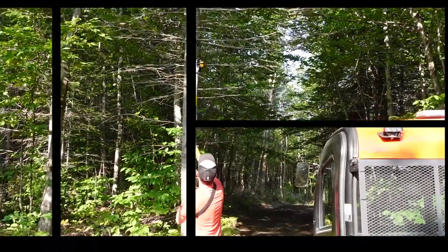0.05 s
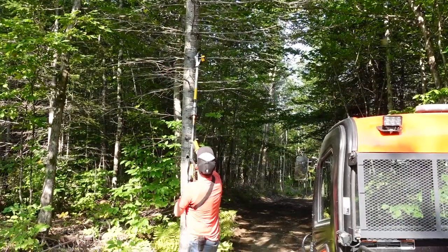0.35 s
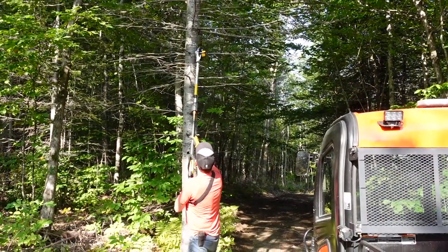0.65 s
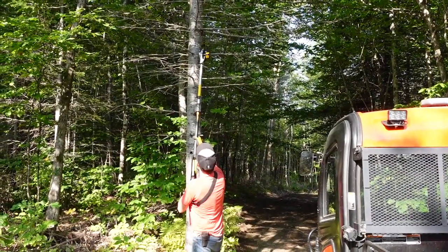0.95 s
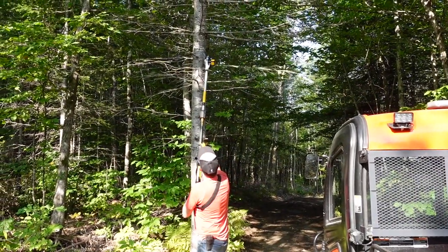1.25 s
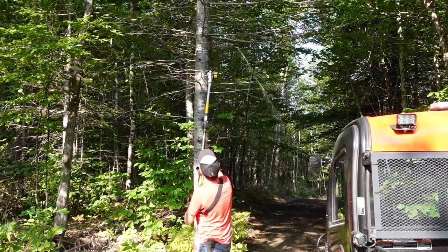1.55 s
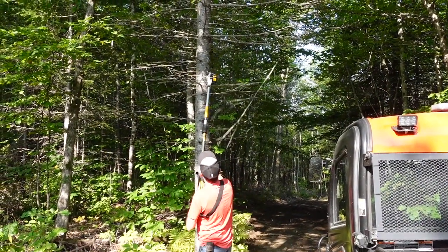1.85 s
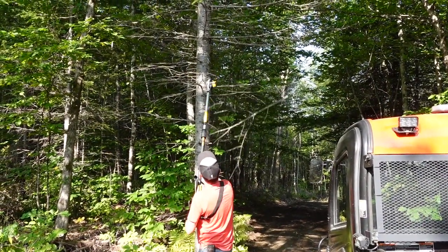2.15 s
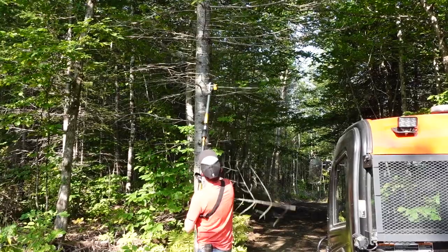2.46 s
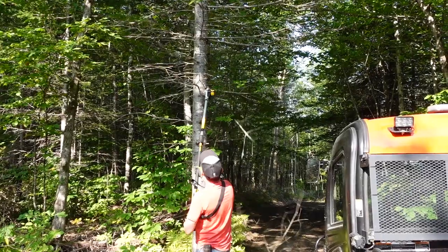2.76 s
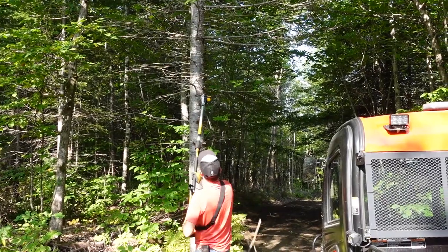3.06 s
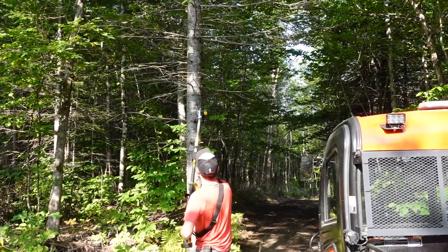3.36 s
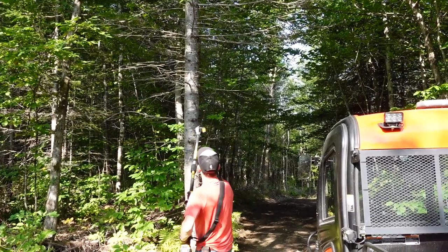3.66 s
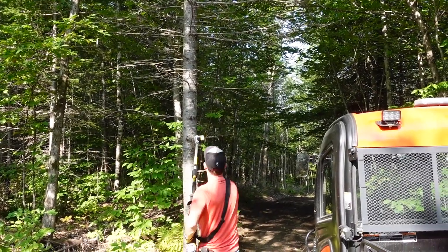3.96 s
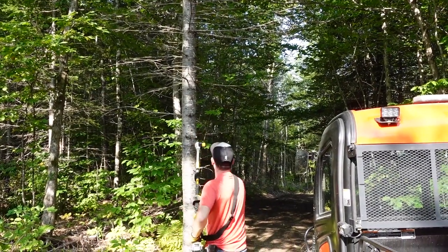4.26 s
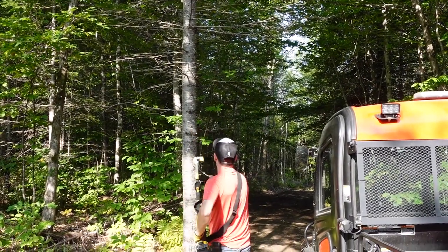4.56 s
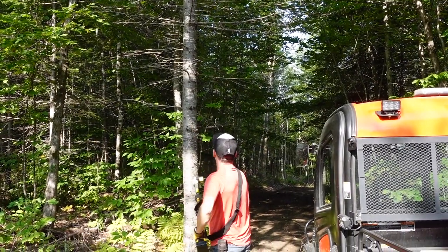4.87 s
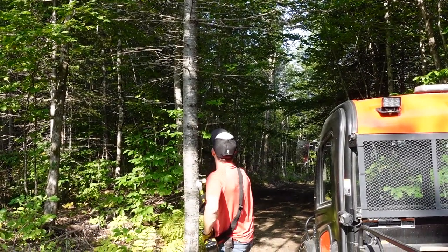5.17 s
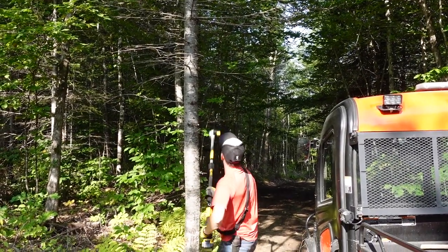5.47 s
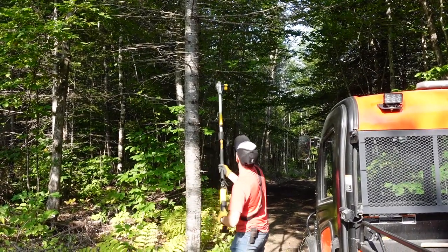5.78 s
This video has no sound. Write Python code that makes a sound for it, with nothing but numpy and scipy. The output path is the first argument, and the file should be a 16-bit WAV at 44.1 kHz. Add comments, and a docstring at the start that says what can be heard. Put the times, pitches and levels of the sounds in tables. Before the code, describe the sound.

In a quiet forest, a cordless pole saw runs four times, some metres from the microphone. Each burst whines up with a rattling, hissing chain and thin metallic squeals, while the teeth catch dry branches with short crunches and sharp knocks. The saw slows briefly between bursts. After the last it coasts to rest, then a step rustles the undergrowth and the pole gives a short scrape.

```python
"""A quiet forest, the microphone some metres from a spruce being limbed with a cordless pole saw.
A faint hum dies away in the still air, then the trigger is pulled four times. With each pull the gears
whine up, the chain rattles, hisses and squeals round its ringing bar, and the teeth bite dry branches.
After the last pull, as the chain coasts to rest, the sawyer steps into the undergrowth and raises
the pole with a scrape."""
import sys
import numpy as np
from scipy import signal
from scipy.fft import rfft, irfft
from scipy.io import wavfile
from scipy.ndimage import uniform_filter1d

SR = 44100
rng = np.random.default_rng(int(sys.argv[2]) if len(sys.argv) > 2 else 0)


def generate_wav(sig):
    """Save sig (samples, or channels by samples) to the path in sys.argv[1] as 16-bit PCM at SR."""
    pcm = np.round(np.clip(np.atleast_2d(sig).T, -1, 1) * 32767).astype(np.int16)
    wavfile.write(sys.argv[1], SR, pcm)


N = 265482
T = np.arange(N) / SR


def undb(db):
    """Decibels to gain."""
    return 10 ** (np.asarray(db) / 20)


def unit(x):
    """Scale to rms 1."""
    return x / np.sqrt(np.mean(x ** 2) + 1e-18)


def curves(rows):
    """Each column after the first, time_s, joined by straight lines."""
    times_s, *columns = np.transpose(rows)
    return [np.interp(T, times_s, column) for column in columns]


def swell(start_s, length_s):
    """A rounded envelope that peaks at 1."""
    return np.sqrt(np.maximum(0, 1 - (2 * (T - start_s) / length_s - 1) ** 2))


def noise():
    """White noise."""
    return rng.standard_normal(N)


def walk(rate_hz):
    """Random levels, rate_hz a second, joined by straight lines, at rms 1."""
    hold = max(int(SR / rate_hz), 1)
    return unit(uniform_filter1d(np.repeat(noise()[:N // hold + 1], hold), hold)[:N])


def colour(x, points):
    """Causal filter through points of freq_hz, gain_db, built from the cepstrum."""
    hz, db = np.transpose(points)
    bins_hz = np.fft.rfftfreq(2048, 1 / SR)
    gain = undb(np.interp(np.log(bins_hz + 1), np.log(hz), db))
    cepstrum = irfft(np.log(gain))
    half = len(cepstrum) // 2
    causal = np.r_[cepstrum[0], 2 * cepstrum[1:half]]
    response = irfft(np.exp(rfft(causal, 2 * half)))
    return signal.oaconvolve(x, response)[:N]


def ring(x, modes):
    """Parallel resonances: pitch_hz, width_hz, gain_db."""
    return sum(undb(db) * signal.lfilter(*signal.iirpeak(hz, hz / width, fs=SR), x)
               for hz, width, db in modes)


def hollow(x, modes):
    """Resonances with steep sides and dark gaps between them, at rms 1."""
    return unit(sum(ring(ring(x, [(hz, 2 * width, db)]), [(hz, 2 * width, 0)])
                    for hz, width, db in modes))


def grains(rate_hz, spread_db):
    """Random impacts, rate_hz a second, scattered in size."""
    hit = rng.random(N) < rate_hz / SR
    return unit(hit * np.sign(noise()) * undb(spread_db * np.clip(noise(), -2, 2)))


def strikes(rate_hz, decay_s, scatter_db):
    """Envelope of blows that come rate_hz times a second, each with its own force."""
    turns = np.cumsum(rate_hz) / SR
    force = undb(scatter_db * np.clip(noise(), -2, 2))[turns.astype(int)]
    return unit(force * np.exp(-(turns % 1) / rate_hz / decay_s))


# The forest air around the microphone: freq_hz, gain_db
AIR_SPECTRUM = [(18, -38), (30, -26), (192, -6.5), (249, -7), (307, -11), (505, -10.5), (852, -11),
                (1470, -17), (2360, -19), (4910, -21), (5590, -23), (7650, -25), (15500, -36)]

def forest(air_db=-67, side_db=-69.5, hum_hz=644, hum_db=-69.5, hum_end_s=0.2):
    """Still air among the trees, a little wide in the low mids, with a brief faint hum."""
    air = undb(air_db + 0.66 * walk(3.8)) * unit(colour(noise(), AIR_SPECTRUM))
    fading = np.clip((hum_end_s - T) / .03, 0, 1)
    band = [(hum_hz, 50, 0)]
    hum = fading * undb(hum_db) * unit(ring(ring(noise(), band), band))
    side = unit(colour(noise(), [(30, -25), (70, -12), (150, -12), (500, 0), (1200, -21), (8000, -47)]))
    return air + hum + undb(side_db) * side * np.array([[1], [-1]])


# The tone of one knock: ratio_to_centre, gain_db
KNOCK_SPECTRUM = [(.08, -44), (.25, -16), (.5, -5), (1, 6.5), (1.7, -1.5), (3, -16), (7, -36)]
# Hard knocks from the saw and the tree: start_s, peak_db, decay_s, centre_hz
KNOCKS = [(0.077, -48.5, 0.0067, 5030), (0.327, -43, 0.0075, 3300), (.345, -54, 0.064, 4000),
          (.458, -25.5, 0.014, 2400), (1.181, -17, 0.0028, 2600), (1.639, -16.5, .012, 2000),
          (2.303, -21, 0.031, 1050), (2.337, -22, 0.039, 1257), (3.005, -23, 0.00057, 5090),
          (3.062, -20, 0.0027, 3484), (3.077, -16, 0.0034, 2901), (3.849, -26, .014, 2184),
          (3.882, -16, 0.0058, 3600), (3.904, -20.5, 0.011, 1040), (4.2, -15, 0.0062, 5066),
          (5.198, -28, 0.011, 1662), (5.398, -22.5, 0.0015, 8080), (5.802, -35, 0.011, 3690)]

def knocks():
    """The trigger clicks, the chain snatches, the bar hits wood and chips fly: short bursts of noise."""
    out = np.zeros(N)
    age_s = T[:SR // 2]
    for start_s, peak_db, decay_s, centre_hz in KNOCKS:
        burst = rng.standard_normal(len(age_s)) * np.exp(-age_s / decay_s)
        knock = colour(burst, [(ratio * centre_hz, db) for ratio, db in KNOCK_SPECTRUM])
        start = int(start_s * SR)
        out[start:start + len(knock)] += undb(peak_db) * knock[:N - start] / np.abs(knock).max()
    return out


def trunks(x, wet_db, t60_s, side_db):
    """The direct sound and its echoes off the trunks, almost the same left and right."""
    tail = noise() * np.exp(-np.log(1000) * T / t60_s) * (T > .008)
    tail = colour(tail, [(100, -3.5), (2500, -15.5), (6000, -11), (14000, -3)])
    echo = signal.oaconvolve(x, tail[:SR] / np.linalg.norm(tail))[:N]
    return x + echo * (undb(wet_db) + undb(side_db) * np.array([[1], [-1]]))


GOVERNED_HZ = 343  # the governor's cap on the shaft rate
# Pulls of the trigger, with levels before speed and torque scale them: pressed_s, released_s,
# rattle_db, hiss_db, bar_db, singing_db, motor_db, strain_db, slap_db, friction_hz_per_s
TRIGGER_PULLS = [(0.455, 1.561, -31.5, -27.5, -33.5, -34.5, -60.5, -23.5, -44, 207.7),
                 (1.872, 3.29, -31, -28, -34, -36.5, -58.5, -24, -34, 340.8),
                 (3.64, 4.182, -32, -29, -34, -46, -49.5, -36, -43, 231.3),
                 (4.328, 4.98, -33, -27.5, -38.5, -42.5, -52, -27, -31.5, 192)]

def saw(lowered_s=4.75, lowering_s=0.37, lowered_db=-3):
    """The saw, some metres off: speed and torque drive its parts, and each pull has its own balance."""
    shaft_hz, torque, coasting = shaft()
    speed = shaft_hz / GOVERNED_HZ
    balance = [(s, *levels) for on, off, *levels, _, _, _ in TRIGGER_PULLS for s in (on, off)]
    rattle_db, hiss_db, bar_db, singing_db, motor_db = curves(balance)
    *_, strain_db, slap_db, _ = latest_pull()
    # Lowered behind the sawyer, the chain is quieter; its hiss and bar lose a little less.
    lowered = np.clip((T - lowered_s) / lowering_s, 0, 1)
    spared_db = 0.5 * lowered
    crawl = .13 * (shaft_hz > 0)  # links knock on the bar until the chain stands still
    links = undb(lowered_db * lowered) * chain(
        shaft_hz,
        rattle_gain=undb(rattle_db + 2.5 * torque) * speed ** 0.68,  # taut, it rattles and hisses more
        housing_gain=undb(rattle_db - 3.5) * speed ** 0.68,
        strain_gain=undb(strain_db) * torque * speed,
        slap_gain=undb(slap_db) * coasting * speed,
        hiss_gain=undb(hiss_db + 4.5 * torque + spared_db) * speed ** 1.19,
        bar_gain=undb(bar_db + spared_db) * np.maximum(speed ** 0.86, crawl))
    whine = undb(rattle_db) * speed * (1 - 0.17 * coasting) * gears(shaft_hz)
    hum = undb(motor_db) * speed ** 1.43 * motor(shaft_hz)
    whistle = undb(singing_db) * speed ** 4 * singing()  # heard only near full speed
    return links + whine + hum + whistle + squeals() + cutting(shaft_hz)


def latest_pull():
    """The columns of the pull that began last, at every moment."""
    rows = np.array(TRIGGER_PULLS)
    return rows[np.maximum(np.searchsorted(rows[:, 0], T) - 1, 0)].T


def shaft(free_hz=468, spin_up_s=.39, coast_s=.58):
    """The trigger spins the motor up, wood brakes it, dry and viscous friction run it down."""
    pulled = sum((T >= on) & (T < off) for on, off, *_ in TRIGGER_PULLS)
    braking = sum(drag * swell(start_s, length_s) for start_s, length_s, *_, drag in WOOD_BITES)
    *_, friction = latest_pull()
    step = SR // 1000
    hz, rates = 0, []
    for on, drag, dry_friction in zip(pulled[::step], braking[::step], friction[::step]):
        push = (free_hz - hz) / spin_up_s if on else -dry_friction - hz / coast_s
        hz = min(max(hz + (push - drag) * step / SR, 0), GOVERNED_HZ)
        rates.append(hz)
    shaft_hz = np.interp(T, T[::step], rates)
    torque = uniform_filter1d(pulled * np.sqrt(np.maximum(1 - shaft_hz / GOVERNED_HZ, 0)), size=1200)
    coasting = uniform_filter1d(1. - pulled, size=2400)
    return shaft_hz * (1 + .005 * walk(7)), torque, coasting


# Links slapping the sprocket: freq_hz, gain_db
RATTLE_SPECTRUM = [(40, -59), (150, -42), (300, -59), (500, -30), (720, -8.5), (1000, 1), (1330, -1),
                   (1510, -2), (1750, 2), (2450, 1), (2850, -1), (3120, -2), (3450, 0.5), (4700, -10),
                   (6600, -19), (16000, -30)]
# Links sliding in the groove: freq_hz, gain_db
HISS_SPECTRUM = [(100, -78), (2500, -32), (4100, 0.5), (4750, -0.5), (5350, -2), (6000, 0), (6650, -2),
                 (7200, 0.5), (8000, 1), (9100, -3), (9650, 0.5), (10050, -2.5), (10700, -2), (12000, -6),
                 (15800, -10.5)]
# The gear housing and the pole: pitch_hz, width_hz, gain_db
HOUSING_MODES = [(589, 20.7, -1), (1015, 58, 2), (1192, 80, 4), (1840, 130, 0), (2319, 64, 6.5),
                 (2383, 92, 9), (2773, 160, 5.5), (4410, 96, 2.5), (4830, 260, 3), (5090, 110, -3),
                 (6100, 230, 0)]
# The drive ringing under torque: pitch_hz, width_hz, gain_db
STRAIN_MODES = [(2206, 170, -2), (2487, 150, 0.5), (2766, 130, -0.5)]
# The bar and its cover, slapped by the slack chain: pitch_hz, width_hz, gain_db
SLAP_MODES = [(1154, 130, -2.5), (2340, 150, 0.5), (2600, 88, -5), (3560, 110, -3), (4350, 400, 1),
              (4780, 280, -11), (7700, 800, -5.5)]
# The steel guide bar: pitch_hz, width_hz, gain_db
BAR_MODES = [(3548, 39, 14), (3676, 17.4, 16), (3739, 66, 12), (3833, 95, 10)]

def chain(shaft_hz, rattle_gain, housing_gain, strain_gain, slap_gain, hiss_gain, bar_gain):
    """Links slap the sprocket and slide in the groove; housing and bar ring with them."""
    links = strikes(200 + shaft_hz, decay_s=0.014, scatter_db=1)
    slack = unit(undb(0.72 * walk(110) + 0.55 * walk(14)))  # the loose chain whips about
    contact_hz = 3000 + 22 * shaft_hz  # a faster chain makes more contacts
    rattle = unit(colour(links * grains(contact_hz, spread_db=2.5), RATTLE_SPECTRUM))
    housing, strain, slap = (hollow(grains(contact_hz, spread_db=2.5), modes)
                             for modes in (HOUSING_MODES, STRAIN_MODES, SLAP_MODES))
    hiss = unit(colour(links * grains(2 * contact_hz, spread_db=4), HISS_SPECTRUM))
    bar = hollow(noise(), BAR_MODES) * undb(walk(14))  # its ring wavers as the tension changes
    return slack * (rattle_gain * rattle + housing_gain * housing + strain_gain * strain
                    + slap_gain * slap + hiss_gain * hiss + bar_gain * bar)


# The partials of the gear whine: shaft_multiple, level_db
GEAR_HARMONICS = [(2, -15), (3, -8), (4, 0), (8, -17)]

def gears(shaft_hz, gain_db=-15.3, resonance_hz=235, half_width_hz=90, lift_db=9.5):
    """Wavering shaft harmonics, lifted as the shaft rate sweeps through the resonance of the drive."""
    phase = 2 * np.pi * np.cumsum(shaft_hz * (1 + .006 * walk(150))) / SR
    whine = sum(undb(db + 3 * walk(60)) * np.sin(multiple * phase) for multiple, db in GEAR_HARMONICS)
    resonance_db = lift_db * np.exp(-((shaft_hz - resonance_hz) / half_width_hz) ** 2)
    radiated = colour(whine, [(60, -50), (200, -30), (450, -18), (620, -13), (780, -2), (950, 0),
                              (1200, 3), (1400, -4), (3000, -3)])
    return radiated * undb(resonance_db + gain_db)


# The motor case in the sawyer's hand: pitch_hz, width_hz, gain_db
CASE_MODES = [(414, 130, 6.5), (653, 60, -2), (696, 210, 0.5)]

def motor(shaft_hz):
    """The rotor hums once a turn, more so at speed, and shakes its hollow case."""
    phase = 2 * np.pi * np.cumsum(shaft_hz * (1 + .008 * walk(98))) / SR
    hum = (shaft_hz / GOVERNED_HZ) ** 2 * undb(-10 + 3 * walk(30)) * np.sin(phase)
    shaking = ring(noise(), CASE_MODES)
    case = colour(shaking, [(60, -28), (250, -6), (330, -6), (520, -1.5), (570, 4), (800, 1),
                            (2000, -17.5)])
    return unit(case) + hum


# The thin modes of the saw head: pitch_hz, width_hz, level_db
HEAD_MODES = [(1030, 80, -9), (1880, 80, -11), (2340, 110, -7), (3450, 90, -8), (3750, 70, -5),
              (4410, 80, -3.5), (4790, 80, -9), (5085, 70, -10), (5850, 120, -6), (9680, 300, -8),
              (10480, 200, -10), (11180, 200, -12)]

def singing():
    """The sliding chain keeps the saw head ringing, each mode swelling and fading on its own."""
    out = 0
    for pitch_hz, width_hz, level_db in HEAD_MODES:
        mode = [(pitch_hz, width_hz, 0)]
        tone = ring(ring(noise(), mode), mode)
        out = out + undb(level_db) * unit(tone * undb(1.8 * walk(7)))
    return out


# The chain squealing as it is snatched, pinched or let go, and longer steady tones where the bar and saw head
# ring: # start_s, length_s, first_hz, settled_hz, level_db
CHAIN_SQUEALS = [(.552, .1, 1520, 1900, -32), (.668, .09, 2000, 2560, -26), (.69, .055, 3450, 3680, -29),
                 (.75, .14, 2380, 2460, -28.5), (.76, .13, 2780, 2860, -30), (.88, .11, 4480, 4430, -31),
                 (.99, .09, 3250, 3420, -24.5), (1.1, .06, 3850, 3520, -30), (1.2, .075, 3560, 3700, -28),
                 (1.23, .33, 2320, 2250, -33), (1.3, .25, 3620, 3740, -32), (1.705, .042, 3800, 3480, -25),
                 (1.897, .045, 1350, 2350, -26), (1.928, .05, 2330, 2470, -26.5),
                 (1.943, .06, 3500, 3580, -23.5), (1.97, .09, 2250, 2740, -27),
                 (2.135, .095, 3660, 3720, -26), (2.322, .022, 3300, 3370, -23),
                 (2.35, .055, 3450, 3400, -27), (2.412, .02, 3550, 3620, -23), (2.44, .42, 3640, 3740, -30),
                 (2.55, .75, 1880, 1880, -37), (3.02, .28, 2340, 2385, -33.5), (3.03, .12, 3640, 3700, -32),
                 (3.15, .12, 3700, 3760, -25.5), (3.42, .13, 3680, 3620, -36),
                 (3.848, .03, 2650, 2400, -22.5), (3.88, .07, 2720, 2620, -32),
                 (3.88, .16, 3760, 3630, -29), (4.08, .06, 3640, 3720, -26.5), (4.35, .05, 3530, 3600, -28),
                 (4.45, .21, 3590, 3640, -27.5), (4.86, .15, 3540, 3620, -32),
                 (4.945, .04, 4500, 4340, -34.5), (5.118, .052, 4050, 3500, -28),
                 (5.15, .04, 4400, 4170, -36), (5.47, .05, 3620, 3650, -44), (5.57, .05, 3850, 3760, -47)]

def squeals(jitter_hz=38, settle_share=.5):
    """Rasping tones from the chain: each glides quickly, then settles towards its pitch."""
    rasp_hz = jitter_hz * (walk(700) + .2 * walk(80))
    out = np.zeros(N)
    for start_s, length_s, first_hz, settled_hz, level_db in CHAIN_SQUEALS:
        on = (T >= start_s) & (T < start_s + length_s)
        glide = np.exp(-(T[on] - start_s) / (settle_share * length_s))
        pitch_hz = settled_hz + (first_hz - settled_hz) * glide + rasp_hz[on]
        tone = np.sin(2 * np.pi * np.cumsum(pitch_hz) / SR)
        out[on] += undb(level_db) * swell(start_s, length_s)[on] * tone
    return out * unit(undb(3 * walk(280)))


# Dry fibres crunching: freq_hz, gain_db
CRUNCH_SPECTRUM = [(30, -56), (100, -46), (200, -7), (290, 0.5), (480, 0.5), (1100, 7), (2300, 10),
                   (3800, 11), (6000, 4), (15000, -11)]
# The limb booming: ratio_to_lowest_note, gain_db
LIMB_SPECTRUM = [(.17, -42), (.55, -33), (.76, -17), (1, -1), (1.4, -5), (1.85, 1), (3.1, -4.5),
                 (10, -17.5)]
# Teeth biting the spruce: start_s, length_s, crunch_db, boom_db, lowest_note_hz, braking_hz_per_s
WOOD_BITES = [(0.961, .024, -27.5, -54, 160, 1500), (0.991, 0.021, -31, -48, 145, 900),
              (1.015, 0.024, -34, -41, 145, 700), (1.042, .03, -36, -41, 147, 100),
              (1.108, 0.05, -29.5, -50, 148, 500), (1.164, 0.033, -48, -44, 150, 100),
              (2.302, .03, -33, -43, 149.4, 1800), (2.335, 0.019, -34, -38.5, 151, 1000),
              (2.361, 0.038, -29, -50, 149.5, 100), (2.43, 0.019, -25.5, -48, 150, 700),
              (2.454, .045, -35, -41.5, 141, 700), (2.736, 0.029, -45, -55, 132.2, 100),
              (3.202, 0.026, -31.5, -49, 158.8, 200), (3.847, 0.043, -30.5, -40.5, 283, 100),
              (3.899, .018, -28.5, -48, 308, 100), (4.607, 0.06, -32.5, -53, 189, 200),
              (4.737, 0.036, -32, -49, 163.2, 300), (4.837, 0.032, -37, -55, 160, 200)]
# Flying sawdust: freq_hz, gain_db
SAWDUST_SPECTRUM = [(500, -38), (3000, 0.5), (4200, -3), (6000, -4), (7300, 4), (8500, 0), (11000, -4),
                    (16000, -13)]
# Sawdust thrown as the chain drags through the cut: start_s, length_s, level_db
SAWDUST_SPRAYS = [(3.838, 0.13, -28.5), (4.425, 0.28, -27)]

def cutting(shaft_hz, attack_s=.003, release_s=.008):
    """Cutters catch abruptly and chop the branch: fibres crunch, the whole limb booms, sawdust sprays."""
    cutters = strikes(np.maximum(shaft_hz / 2, 1), decay_s=0.006, scatter_db=1.5)
    chops = cutters * grains(12000, spread_db=1.5)
    crunch = unit(colour(chops, CRUNCH_SPECTRUM))
    sawdust = unit(colour(grains(15000, spread_db=3), SAWDUST_SPECTRUM))
    out = sawdust * sum(undb(db) * swell(start_s, length_s) for start_s, length_s, db in SAWDUST_SPRAYS)
    for start_s, length_s, crunch_db, boom_db, note_hz, _ in WOOD_BITES:
        catch = np.clip((T - start_s) / attack_s, 0, 1)
        release = np.exp(-np.maximum(T - start_s - length_s, 0) / release_s)
        boom = unit(colour(chops, [(ratio * note_hz, db) for ratio, db in LIMB_SPECTRUM]))
        out += catch * release * (undb(crunch_db) * crunch + undb(boom_db) * boom)
    return out


# Leaves and twigs on the forest floor: freq_hz, gain_db
UNDERGROWTH_SPECTRUM = [(35, -71), (60, -35), (285, -14), (521, -19.5), (721, -7.5), (810, -11), (999, -5),
                        (1100, -12), (1260, -5.5), (2250, -4), (2840, -2.5), (4220, -2), (15500, -16)]
# The rustle of undergrowth and clothing through one step: time_s, level_db
STEP_LEVELS = [(5.65, -80), (5.75, -52.5), (5.79, -47.5), (5.82, -41.5), (5.92, -39), (5.954, -46),
               (6.02, -37)]

def undergrowth():
    """Leaves and twigs crackle under the sawyer's step."""
    level_db, = curves(STEP_LEVELS)
    onset = np.clip((T - STEP_LEVELS[0][0]) / 0.017, 0, 1)
    crackle = grains(9000, spread_db=-0.5) * undb(1.9 * walk(120))
    return onset * undb(level_db) * unit(colour(crackle, UNDERGROWTH_SPECTRUM))


# The scraped pole: pitch_hz, width_hz, gain_db
POLE_MODES = [(1380, 350, -7), (1880, 400, 3), (2340, 340, 4), (3730, 460, -1)]

def scrape(start_s=5.936, length_s=0.072, gain_db=-32.5, decay_s=0.09, slip_hz=278):
    """The pole sticks and slips against the sawyer's gear as it is raised."""
    slips = strikes(slip_hz * undb(2 * walk(60)), decay_s=0.0044, scatter_db=-0.5) * noise()
    easing = np.exp(-np.maximum(T - start_s, 0) / decay_s)
    return undb(gain_db) * swell(start_s, length_s) * easing * unit(ring(slips, POLE_MODES))


def scene():
    """From where the microphone stands: the sawyer at work among the trunks, still air all round."""
    work = saw() + knocks() + undergrowth() + scrape()
    return trunks(work, wet_db=-12, t60_s=0.27, side_db=-55) + forest()


def record(dry, low_cut_hz=55, top_hz=15700):
    """The camera's microphone thins the deepest bass and cuts the top."""
    thinned = signal.sosfilt(signal.butter(1, low_cut_hz, "high", fs=SR, output="sos"), dry)
    return signal.sosfilt(signal.ellip(10, .2, 80, top_hz, fs=SR, output="sos"), thinned)


dry = scene()
out = record(dry)
generate_wav(out)
```